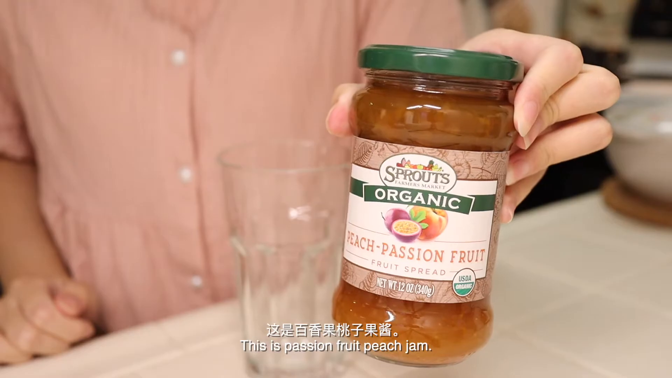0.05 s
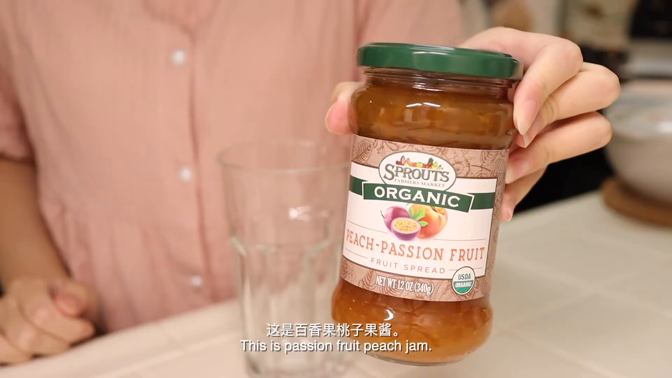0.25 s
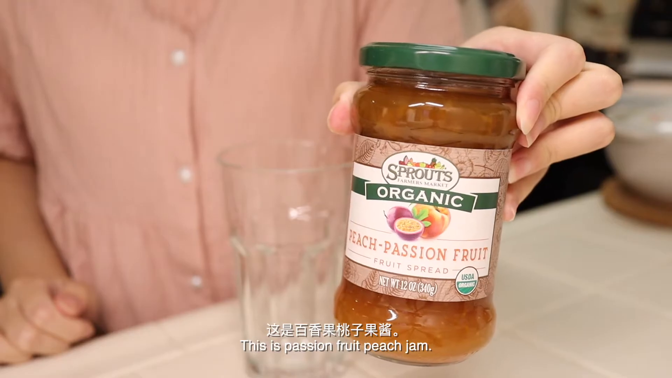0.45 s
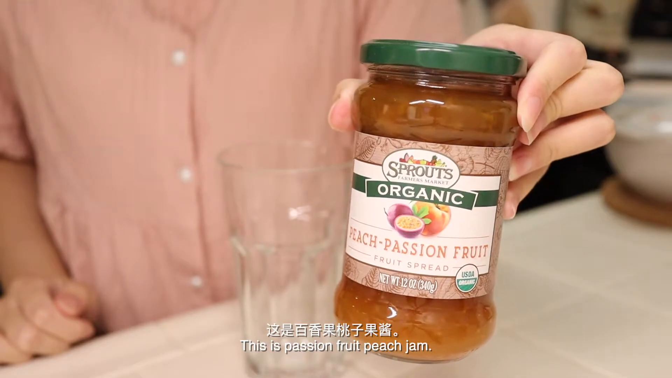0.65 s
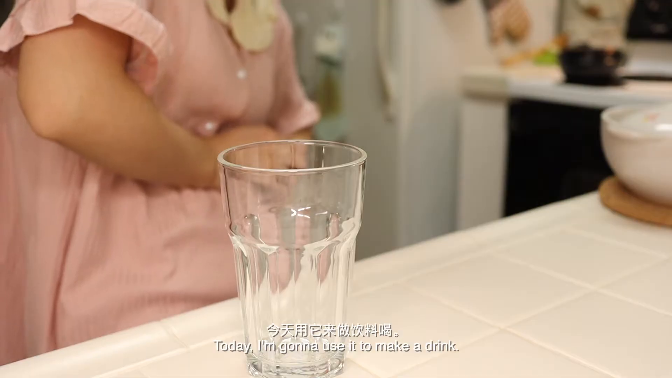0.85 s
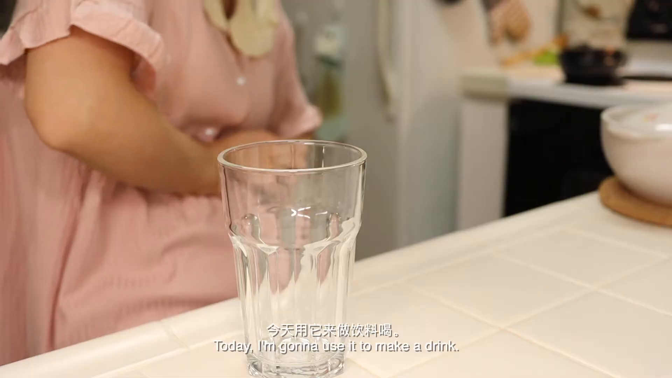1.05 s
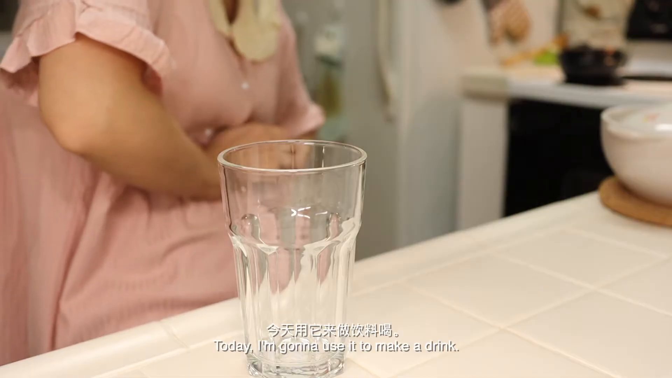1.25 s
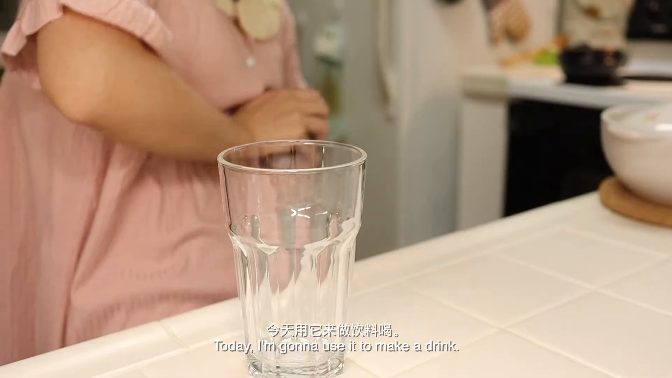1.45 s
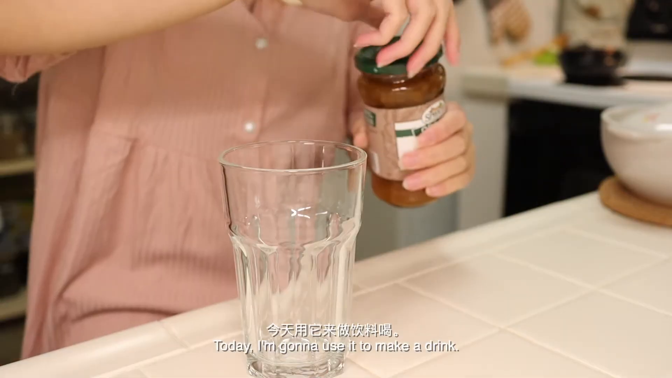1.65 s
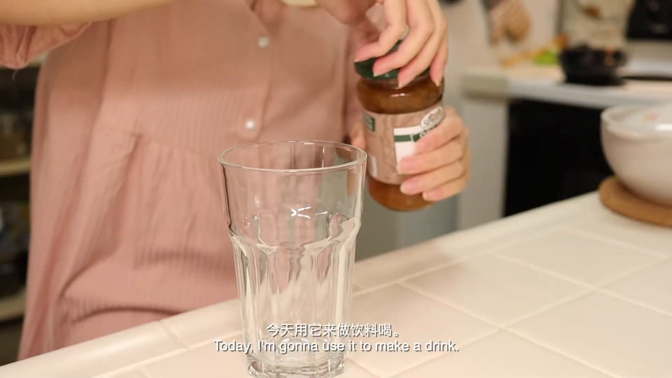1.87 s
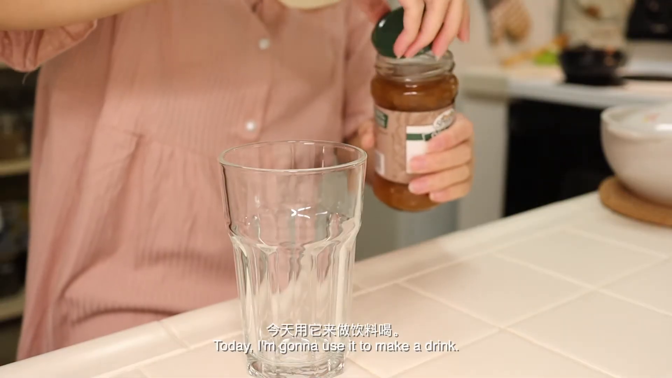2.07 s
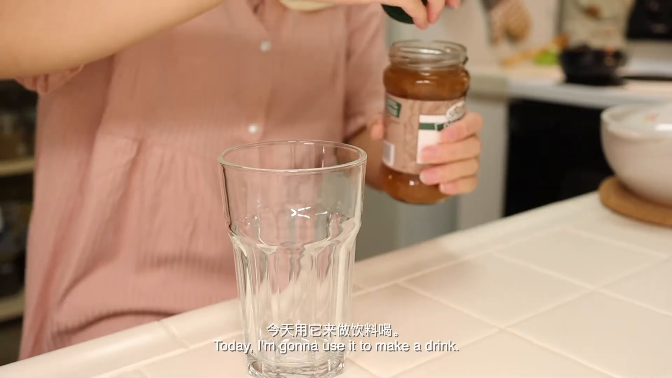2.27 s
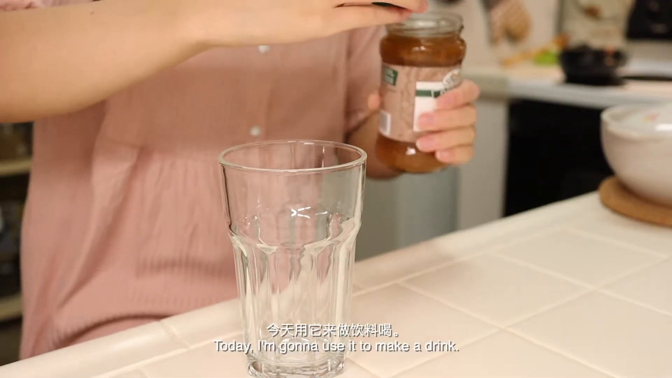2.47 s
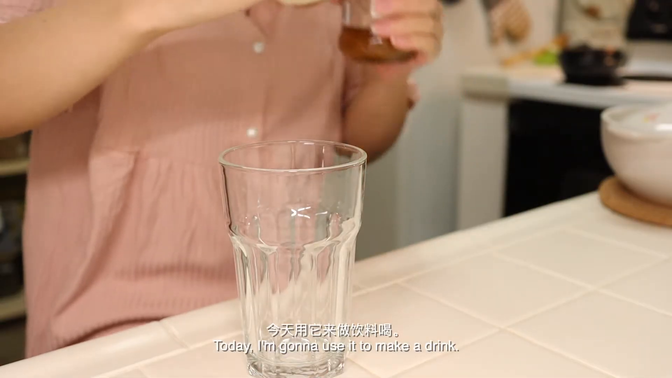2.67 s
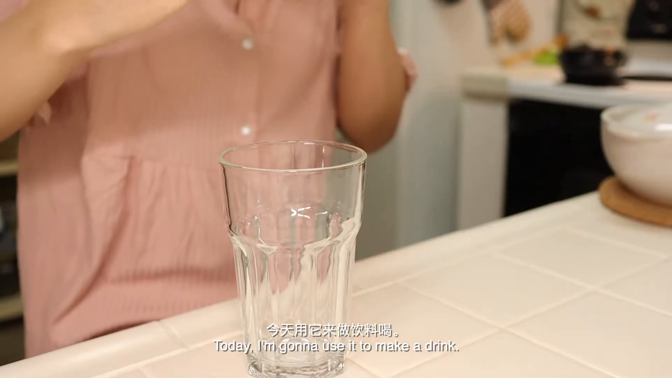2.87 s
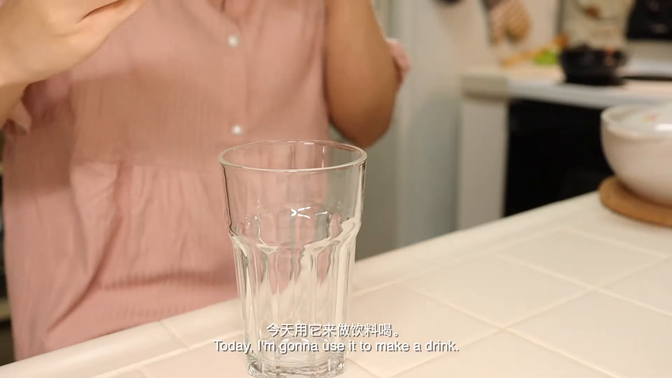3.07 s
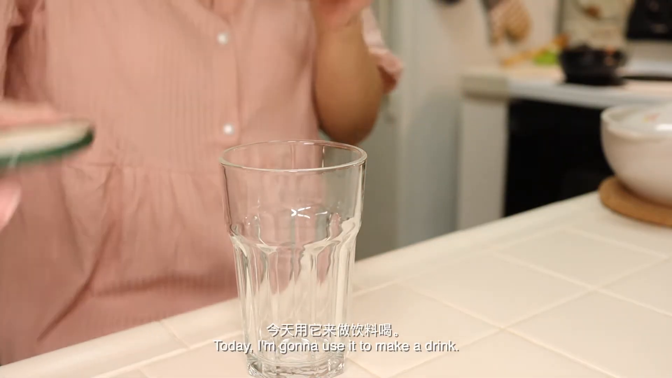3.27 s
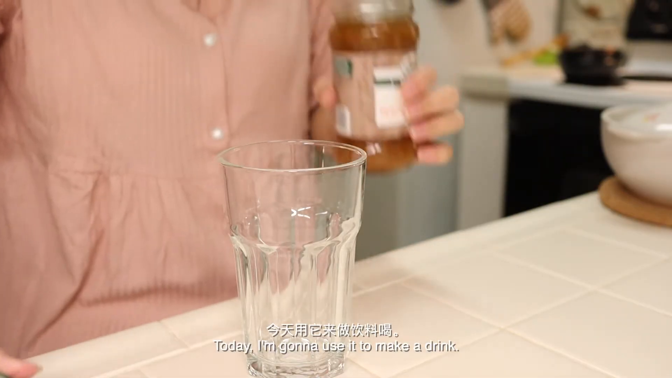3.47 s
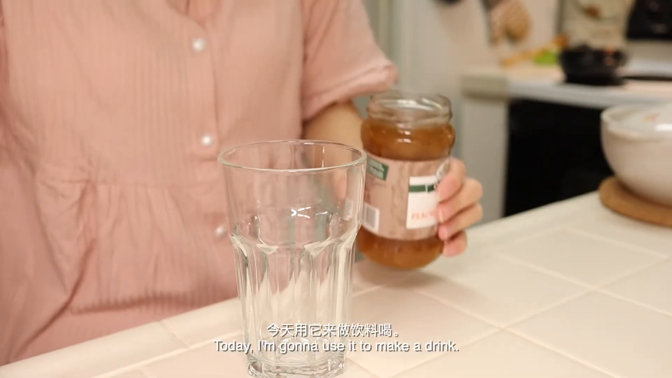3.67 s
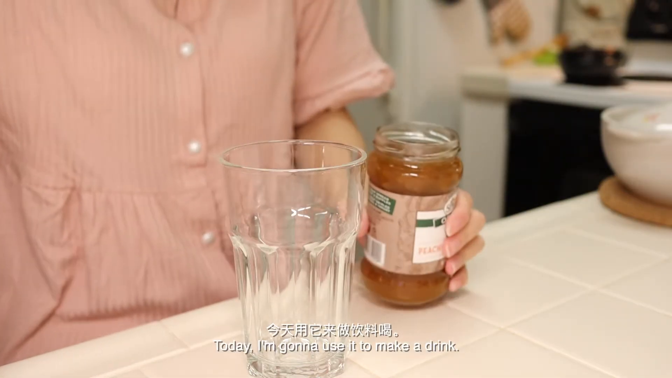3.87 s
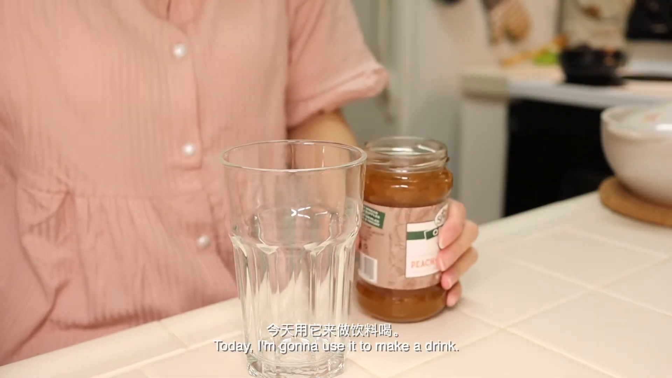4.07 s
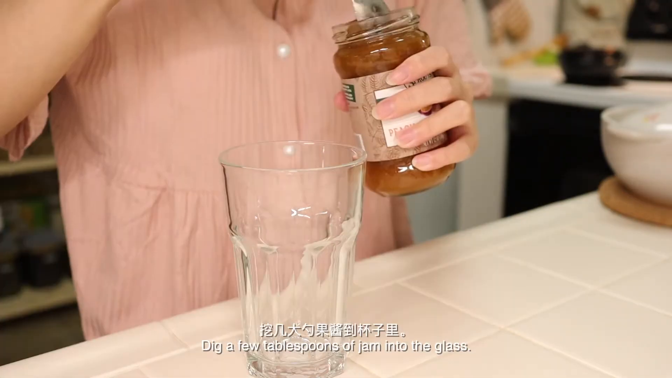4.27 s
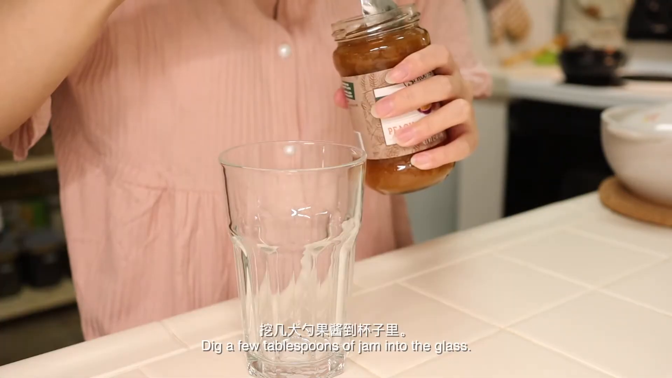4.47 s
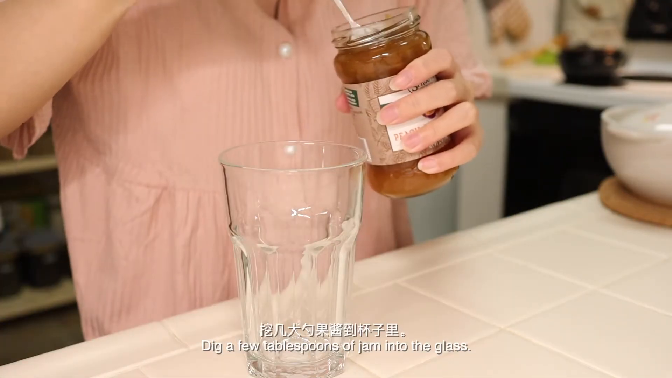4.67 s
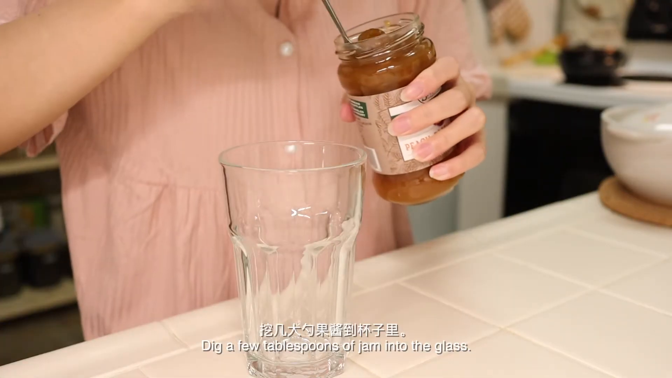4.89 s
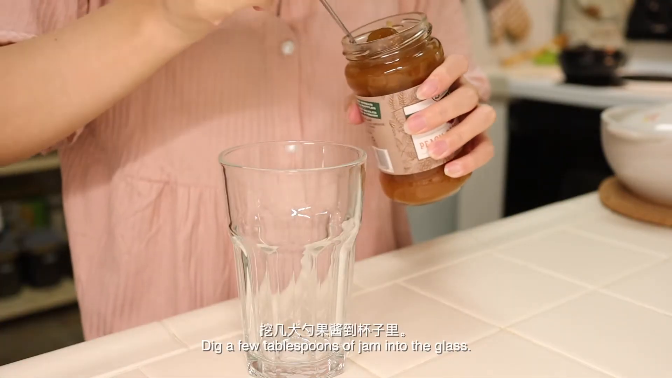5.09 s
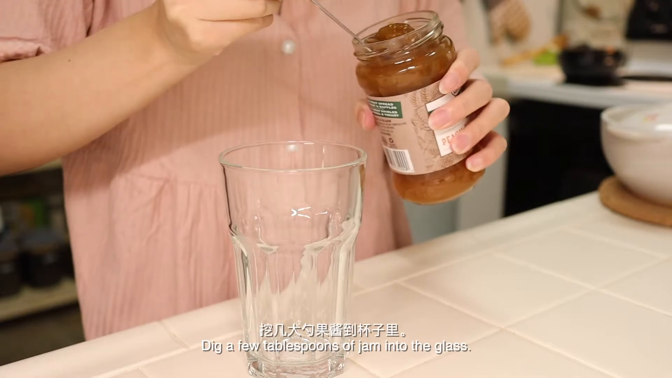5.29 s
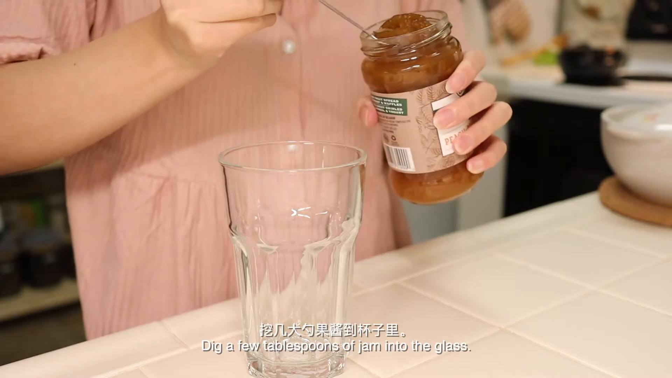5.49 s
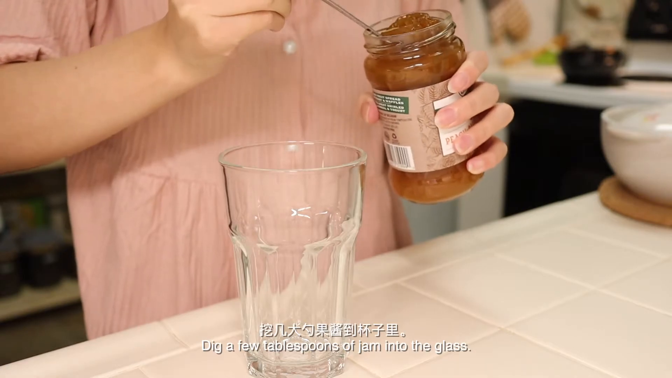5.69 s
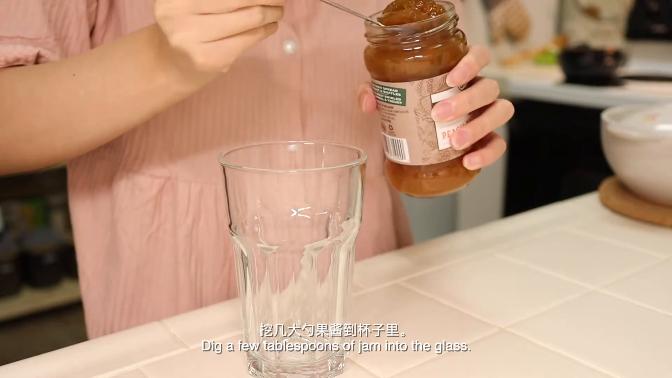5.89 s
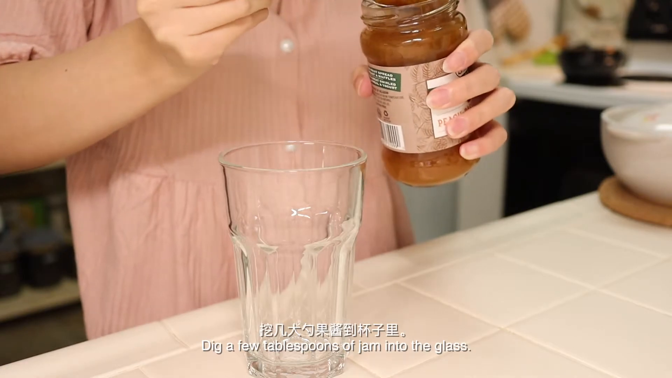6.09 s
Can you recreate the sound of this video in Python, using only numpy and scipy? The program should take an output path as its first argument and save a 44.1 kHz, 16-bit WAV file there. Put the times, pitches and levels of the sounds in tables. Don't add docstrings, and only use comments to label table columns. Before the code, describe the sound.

A quiet tiled kitchen with soft room noise and a low refrigerator hum throughout, heard by a close microphone. After a second of near silence, small finger ticks lead to an explosive lid pop at 1.19, overloading the input, with a low puff of air and a metallic buzz fading by 1.35. From 1.75 the lid catches and drags on glass threads, clicking at 1.82 and springing free at 1.92. Quiet follows; faint ticks and a rustle swell near 3.3 and stop abruptly. At 3.55 the lid lands hard on tile, bright and quickly settling. At 3.86 to 3.91 a spoon chatters and rings among cutlery. A heavy wooden drawer thud at 4.03 rolls on, squeezed air rising in pitch, with another knock at 4.24 before a sudden cut at 4.26. A soft tick comes at 4.68, a clear spoon tick on the glass rim at 4.89, then tiny sticky clicks around 5.4 to 5.55.

```python
import sys
import numpy as np
from scipy import signal
from scipy.io import wavfile
from scipy.ndimage import uniform_filter1d

SR = 44100
rng = np.random.default_rng(int(sys.argv[2]) if len(sys.argv) > 2 else 0)


def gain_from_decibels(decibels):
    exponent = np.asarray(decibels, float) / 20
    return 10 ** exponent


def transcribe(signal):
    frames = np.atleast_2d(signal).T
    limited = np.clip(frames, -1, 1)
    pcm = np.round(limited * 32767).astype(np.int16)
    wavfile.write(sys.argv[1], SR, pcm)


N = 270774
RUSTLE_CUT_S, CUT_S = 3.3435, 4.2603


def evened(x):
    return x / np.sqrt(np.mean(x ** 2) + 1e-20)


def peaked(x):
    return x / abs(x).max()


def read(points, hz):
    f, value = np.transpose(points)
    return np.interp(np.log(hz + 1), np.log(f + 1), value)


def add(mix, s, sound):
    part = mix[round(s * SR):][:len(sound)]
    part += sound[:len(part)]


def above(x, hz, order):
    return signal.sosfilt(signal.butter(order, hz, "high", fs=SR, output="sos"), x)


def banded(x, edges):
    return signal.sosfilt(signal.butter(2, edges, "band", fs=SR, output="sos"), x)


def causal(points, size=4096):
    hz = abs(np.fft.fftfreq(size, 1 / SR))
    log_gain = np.log(gain_from_decibels(np.maximum(read(points, hz), -80)))
    return np.fft.ifft(np.exp(np.conj(signal.hilbert(log_gain)))).real[:size // 2]


def burst(ms, size=2048):
    noise = rng.standard_normal(size)
    noise[0] = 3
    return noise * np.exp(-np.arange(size) / (SR * max(ms, .05) / 1000))


# (frequency [Hz], T60 [s])
ECHO_T60 = [(100, 0.72), (500, 0.35), (2000, 0.25), (8000, 0.32), (15000, 0.19)]
# (frequency [Hz], level [dB])
ECHO_COLOUR = [(100, 11), (500, -5.5), (1200, 4.5), (6000, 2.5), (15000, 4)]


def kitchen(x, rise_ms):
    taps = np.zeros(SR // 2)
    at = np.arange(100, SR // 2 - 20, 20)
    at = at + rng.integers(0, 20, len(at))
    taps[at] = rng.choice([-1., 1.], len(at))
    hz, t, z = signal.stft(taps, SR, nperseg=256)
    z = z * gain_from_decibels(read(ECHO_COLOUR, hz)[:, None] - 60 * t / read(ECHO_T60, hz)[:, None])
    tail = signal.istft(z, SR, nperseg=256)[1]
    tail = tail * (1 - np.exp(-np.arange(len(tail)) * 1000 / (rise_ms * SR)))
    return signal.oaconvolve(x, tail / np.linalg.norm(tail))[:N]


def struck(contacts, modes, crack, wet_db, rise_ms, spread_db=2.0):
    cracks, rung = np.zeros(N), np.zeros(N)
    t, colour = np.arange(SR // 2) / SR, causal(crack)
    hz, db, t60 = np.transpose(modes)
    decays = np.exp(np.outer(2j * np.pi * hz - np.log(1000) / t60, t))
    for s, peak_db, ring_db, ms, top_hz in contacts:
        spot_db, phase = rng.standard_normal((2, len(modes)))
        weights = gain_from_decibels(db + spread_db * spot_db) * np.exp(1j * phase) / (1 + (hz / top_hz) ** 2)
        ring = (weights @ decays).imag * np.minimum(t / 0.00028, 1)
        add(rung, s, gain_from_decibels(peak_db + ring_db) * peaked(ring))
        dull = signal.butter(2, min(top_hz, 20000), fs=SR)
        blow = signal.lfilter(*dull, signal.fftconvolve(burst(ms), colour))
        add(cracks, s, gain_from_decibels(peak_db) * peaked(blow))
    to_walls = cracks + 0.4 * rung
    return cracks + rung + gain_from_decibels(wet_db + 1.5) * kitchen(to_walls, rise_ms)


def rubbed(strokes, modes, per_s, top_hz, damping):
    t = np.arange(N) / SR
    slips = rng.standard_normal(N) * (rng.random(N) < per_s / SR)
    ring, short = 0, t[:4000]
    for hz, db, t60 in modes:
        decay = gain_from_decibels(db - 60 * short / (damping * t60))
        ring = ring + decay / (1 + (hz / top_hz) ** 2) * np.sin(2 * np.pi * hz * short)
    pressure = 0
    for s, length, db in strokes:
        pressure = pressure + gain_from_decibels(db) * np.sin(np.pi * np.clip((t - s) / length, 0, 1))
    return evened(signal.oaconvolve(slips, ring)[:N]) * pressure


def ticks(rows, share, ms):
    out = np.zeros(N)
    for s, db, hz in rows:
        edges = np.clip([hz * (1 - share / 2), hz * (1 + share / 2)], [500, 900], [15000, 19000])
        add(out, s, gain_from_decibels(db) * peaked(banded(burst(ms), edges)))
    return out


# (frequency [Hz], level [dB])
AIR = [(30, -27), (49, -1), (75, -14.5), (95, 4.5), (115, -20), (146, -3.5), (329, -8.5), (424, -1.5),
       (593, -14), (1190, -15), (2600, -21.5), (3100, -24.5), (14900, -33), (16200, -41)]


def room_noise():
    frames, hz = N // 512 + 6, np.fft.rfftfreq(2048, 1 / SR)
    a, b, patches = rng.standard_normal((frames, 1025, 3)).T
    patches = evened(uniform_filter1d(uniform_filter1d(patches, size=14, axis=0), size=6, axis=1))
    z = (a + 1j * b) * gain_from_decibels(read(AIR, hz)[:, None] + 0.45 * patches)
    return gain_from_decibels(-46 - 1.5) * evened(signal.istft(z, nperseg=2048, noverlap=1536)[1][:N])


# (frequency [Hz], rms level [dB])
HUM = [(48, -59), (59.5, -58.5), (119, -56), (360, -62), (431, -75)]


def refrigerator():
    out, t = np.zeros(N), np.arange(N) / SR
    for hz, db in HUM:
        waver = uniform_filter1d(uniform_filter1d(rng.standard_normal(N), size=6000), size=6000)
        waver = evened(waver)
        phase = 2 * np.pi * (hz * t + rng.random()) + 0.76 * waver[::-1]
        out += np.sqrt(2) * gain_from_decibels(db + 1.5 * waver) * np.sin(phase)
    return out


def rustle():
    until = RUSTLE_CUT_S - np.arange(N) / SR
    grains = rng.standard_normal(N) * (rng.random(N) < 2700 / SR)
    crackle = evened(banded(grains, (3500, 13000)))
    return crackle * gain_from_decibels(-49 - 170 * abs(until)) * (until > 0)


# (time [s], peak level [dB], centre [Hz])
GRIP = [(1.113, -41, 2110), (1.149, -37, 3500), (1.1565, -33, 2230), (1.158, -32, 5030),
        (1.1767, -15.5, 2170), (1.178, -21, 5030), (2.017, -47, 4900), (3.977, -36, 2000),
        (4.677, -29, 7800), (5.4382, -44, 2620)]
# (time [s], peak level [dB], centre [Hz])
FOIL = [(1.180, -22, 7000), (1.1835, -37, 8000), (3.214, -44, 10000), (3.287, -51, 9000),
        (3.305, -48, 7500), (3.324, -32.5, 5900), (3.3404, -37, 8400), (4.847, -44, 8800),
        (4.866, -44, 7000), (5.438, -48, 10000)]
# (time [s], peak level [dB], centre [Hz])
JAM = [(5.390, -50, 13000), (5.403, -47, 13500), (5.484, -45, 8800), (5.507, -39, 9400),
       (5.520, -42, 11500), (5.527, -32, 14000), (5.544, -45, 11500)]


def touches():
    out = ticks(GRIP, share=0.26, ms=1.5) + ticks(FOIL, share=1, ms=4.8)
    out = out + ticks(JAM, share=0.29, ms=1.1) + rustle()
    t = np.arange(N) / SR
    heard = (t < RUSTLE_CUT_S) | (t > CUT_S - .01)
    return (out + gain_from_decibels(-6.5) * kitchen(out, rise_ms=4.4)) * heard


# (time [s], level [dB], frequency [Hz], T60 [s])
FREE_RINGS = [(1.2004, -16, 7410, .045), (3.306, -42, 5530, .025), (3.553, -19, 5095, .18),
              (3.553, -28, 9400, .03), (3.553, -30, 6218, .08), (3.554, -22.5, 4188, .17),
              (3.554, -36, 10960, .12), (3.866, -21.5, 3815, .19), (3.867, -25, 4492, .12),
              (3.889, -27, 4495, .15), (3.862, -30, 3141, .18), (3.889, -29, 3141, .24),
              (4.026, -33, 2116, .62), (4.027, -38.5, 5297, .18), (1.750, -33, 905, .04),
              (1.1884, -2, 2520, .007), (1.2003, -17, 1040, .03), (4.192, -34, 256, .12),
              (4.238, -27, 500, .12), (4.029, -19, 108, .16), (4.027, -16, 492, .18),
              (4.095, -22, 290, .22), (4.026, -20, 1500, .07), (4.24, -33, 105, .1),
              (4.889, -26, 3618, .08), (3.897, -23, 3138, .03), (4.0258, -12, 1060, .035),
              (1.189, -4, 1030, .022), (1.189, -14, 1350, .01), (3.8612, -16, 7400, .03),
              (3.888, -24, 11830, .03), (1.930, -33, 1110, .04), (1.836, -39, 1640, .08),
              (2.018, -44, 3493, .04), (2.018, -49, 4255, .08), (1.75, -47, 4110, .05),
              (1.923, -32, 1640, .08), (1.837, -41, 2190, .05), (1.971, -45, 1640, .08)]
# (time [s], level [dB], frequency [Hz], damped after [s])
HELD_RINGS = [(1.152, -38, 2060, 0.023), (1.237, -21.5, 1014, 0.023), (1.992, -44.5, 1637, 0.03),
              (1.355, -45, 1030, 0.026), (3.331, -42, 2220, 0.015), (3.555, -19.5, 1136, 0.02),
              (3.58, -32.5, 1149, 0.021), (3.736, -51.5, 3100, 0.099)]


def rings():
    out = np.zeros(N)
    free = [(s, db, hz, t60, t60) for s, db, hz, t60 in FREE_RINGS]
    held = [(s, db, hz, 0.28, length) for s, db, hz, length in HELD_RINGS]
    for s, db, hz, t60, length in free + held:
        t = np.arange(0, length, 1 / SR)
        fades = np.minimum(t / 0.00011, 1) * np.minimum((length - t) / 0.0033, 1)
        add(out, s, gain_from_decibels(db - 60 * t / t60) * np.sin(2 * np.pi * (hz * t + rng.random())) * fades)
    return out + gain_from_decibels(-15.5) * kitchen(out, rise_ms=6.2)


# (time [s], pitch [Hz], rms level [dB])
SQUEEZE = [(4.145, 280, -50), (4.162, 297, -36), (4.178, 330, -37), (4.192, 360, -39), (4.208, 376, -33),
           (4.222, 412, -39), (4.235, 400, -44)]


def squeezed_air():
    t, (s, hz, db) = np.arange(N) / SR, np.transpose(SQUEEZE)
    turns = np.cumsum(np.interp(t, s, hz)) / SR
    wobble = .25 * evened(uniform_filter1d(rng.standard_normal((2, N)), size=500, axis=1))
    tone = np.sin(2 * np.pi * turns + wobble[0])
    tone += gain_from_decibels(-8) * np.sin(2 * np.pi * 1.9 * turns + 2 * wobble[1])
    fades = np.clip(np.minimum(t - s[0], s[-1] - t) / 0.0068, 0, 1)
    out = np.sqrt(2) * tone * gain_from_decibels(np.interp(t, s, db)) * fades
    return out + gain_from_decibels(-4) * kitchen(out, rise_ms=3.4)


# (time [s], peak level [dB], ring level [dB], crack length [ms], hardness [Hz])
TWIST = [(1.749, -43, 7, 0.82, 2500), (1.791, -47, 10, 3, 2000), (1.803, -45, 15, 5.7, 1500),
         (1.810, -41, 12, 3, 1500), (1.8172, -23.5, -0.5, 1.8, 14000), (1.8215, -29.5, 10, 1.3, 9000),
         (1.8365, -30, -1, 1.7, 12000), (1.848, -40, 2, 2.7, 4000), (1.905, -34.5, -18, 5, 4000)]
# (frequency [Hz], level [dB], T60 [s])
JAR_MODES = [(900, -2, .04), (1160, 0, .05), (1290, -5, .05), (1640, -11, .05), (4200, -4, .025),
             (4030, -6, .03), (8000, -3, .015)]
# (frequency [Hz], level [dB])
TWIST_CRACK = [(350, -77), (600, -27), (1160, 12.5), (1510, -7), (3250, -17.5), (4160, -1), (4800, -25),
               (5800, -11), (7000, -20), (8270, -18), (16000, -35)]
# (start [s], length [s], top level [dB])
DRAG = [(1.742, 0.036, -47), (1.765, 0.066, -44), (1.82, 0.058, -46.5), (1.862, 0.055, -52),
        (1.975, 0.06, -60)]


def twist():
    knocks = struck(TWIST, JAR_MODES, TWIST_CRACK, wet_db=-3.5, rise_ms=3.2)
    return knocks + rubbed(DRAG, JAR_MODES, per_s=810, top_hz=1800, damping=1.0)


# (time [s], peak level [dB], ring level [dB], crack length [ms], hardness [Hz])
RELEASE = [
    (1.9221, -15.5, -10.5, 1.8, 15000),
    (1.935, -33, -12, 1.9, 9000),
]
# (frequency [Hz], level [dB], T60 [s])
NECK_MODES = [(1156, -1, .05), (1625, 0, .08), (4188, -4, .05), (6400, -12, .02), (7434, -5, .05),
              (8200, 0, .012), (11500, -14, .03)]
# (frequency [Hz], level [dB])
RELEASE_CRACK = [(350, -61), (600, -34), (1590, -1), (2470, -65), (3730, -8), (4110, -6), (5400, -25),
                 (8270, 1), (16000, -73)]


def release():
    return struck(RELEASE, NECK_MODES, RELEASE_CRACK, wet_db=-14.5, rise_ms=2.3)


# (time [s], peak level [dB], ring level [dB], crack length [ms], hardness [Hz])
LAID = [
    (3.5530, -1.5, -9.5, 1.16, 18900),
    (3.5578, -9, -19, 1.7, 12000),
    (3.5647, -24.5, 9.5, 1.1, 18900),
]
# (frequency [Hz], level [dB], T60 [s])
TILE_MODES = [(2961, -14, .03), (3106, -14, .04), (3817, -14, .04), (4495, -9, .02), (4985, -8, .04),
              (5512, -9, .06), (5722, -10, .04), (6428, -9, .035), (7854, -16, .03), (9400, -19, .015),
              (10960, -17, .02), (15200, -15, .01)]
# (frequency [Hz], level [dB])
LAID_CRACK = [(290, -61), (500, -31.5), (1030, -19.5), (1130, -14), (1250, -29), (1550, -27), (2910, -16),
              (3130, -12.5), (3610, -19), (4060, -15), (4980, -6), (7160, -22), (8400, -33), (10900, -29),
              (13200, -43), (15200, -25), (16200, -55)]


def lid_laid_down():
    return struck(LAID, TILE_MODES, LAID_CRACK, wet_db=-9, rise_ms=2.6)


# (time [s], peak level [dB], ring level [dB], crack length [ms], hardness [Hz])
SPOON = [(3.8611, -5.5, -4, 1.2, 19000), (3.8640, -17, -6, 0.88, 8000), (3.8670, -13, -7.5, 2.1, 19000),
         (3.8725, -25, -12, 1.8, 12000), (3.8795, -22, -13, 2.3, 9000), (3.8880, -10.5, -10, 3, 19200),
         (3.8945, -24, -8, 1.8, 12000), (3.8985, -12, -15, 2, 8000), (3.910, -23, -4, 2, 5000)]
# (frequency [Hz], level [dB], T60 [s])
SPOON_MODES = [(1087, -10, .04), (3052, -10, .04), (4016, -9, .05), (4490, -7, .05), (5033, -8, .045),
               (5518, -6, .1), (6465, -14, .04), (7025, -6, .06), (7251, -4, .045), (9335, -15, .03),
               (11830, -10, .015), (13740, -14, .04), (15200, -16, .025)]
# (frequency [Hz], level [dB])
SPOON_CRACK = [(290, -44), (500, -38), (1080, -2.5), (1340, -12.5), (2550, -16.5), (3040, 6), (3410, -23),
               (3720, -0.5), (4240, -13.5), (7270, -5.5), (8160, -14.5), (11900, -14.5), (13100, -28),
               (14400, -20), (16200, -46)]
# (start [s], length [s], top level [dB])
CHATTER = [
    (3.862, 0.021, -33),
    (3.878, .03, -27),
    (3.90, 0.049, -43.5),
]


def spoon():
    knocks = struck(SPOON, SPOON_MODES, SPOON_CRACK, wet_db=-12.0, rise_ms=2.5)
    return knocks + rubbed(CHATTER, SPOON_MODES, per_s=940, top_hz=12000, damping=0.38)


# (time [s], peak level [dB], ring level [dB], crack length [ms], hardness [Hz])
RIM = [
    (4.8880, -12.5, -7.5, 3.2, 19000),
    (4.900, -26, -6, 3.3, 12000),
    (4.912, -32, 0, 1.1, 6000),
]
# (frequency [Hz], level [dB], T60 [s])
RIM_MODES = [(1744, -1, .035), (2035, -7, .05), (2300, -5, .025), (2930, -4, .025), (3300, -4, .018),
             (3618, 0, .03), (3967, -5, .04), (5152, -4, .04), (6202, -8, .05), (6842, -6, .04),
             (7181, -9, .05), (9362, -5, .04), (10890, -4, .14), (11340, -2, .07)]
# (frequency [Hz], level [dB])
RIM_CRACK = [(590, -59), (1000, -48), (1710, -5), (2620, -18), (2910, 2), (3620, 2.5), (4310, -19),
             (4960, -9.5), (5970, -9.5), (11300, -9), (16000, -24)]


def rim_tick():
    return struck(RIM, RIM_MODES, RIM_CRACK, wet_db=-11.5, rise_ms=3.3)


# (time [s], peak level [dB], ring level [dB], crack length [ms], hardness [Hz])
DRAWER = [(4.0256, -2, -4.5, 4.6, 11900), (4.031, -7.5, -4, 1.7, 2500), (4.0392, -10.5, -7, 0.95, 1800),
          (4.049, -12, -1.5, 1.8, 1800), (4.0672, -14, 1.5, 2.5, 5000), (4.0805, -15, -12, 2.7, 1500),
          (4.092, -17.5, -7.5, 5.8, 1800), (4.105, -26, -9, 2.7, 1200), (4.1995, -37, -4, 3.6, 900),
          (4.2375, -16.5, -6.5, 0.97, 1720), (4.250, -28, -2, 4.4, 910)]
# (frequency [Hz], level [dB], T60 [s])
DRAWER_MODES = [(108, -9, .1), (274, -6, .22), (297, -7, .3), (365, -9, .15), (490, 0, .2), (538, -8, .18),
                (630, -5, .18), (706, -6, .16), (754, -10, .14), (855, -6, .16), (1020, -4, .14),
                (1085, -4, .1), (1308, -7, .1), (1500, -6, .1)]
# (frequency [Hz], level [dB])
DRAWER_CRACK = [(53, -47), (100, -16), (195, -8), (280, 4), (419, -6), (1090, -0.5), (1510, -15.5),
                (1830, -12), (2180, -11.5), (4080, -33), (9510, -38), (16000, -68)]
# (start [s], length [s], top level [dB])
ROLL = [(4.095, 0.052, -31.5), (4.145, 0.043, -33.5), (4.18, 0.048, -34), (4.228, .07, -33.5)]


def drawer():
    thuds = struck(DRAWER, DRAWER_MODES, DRAWER_CRACK, wet_db=-13.5, rise_ms=1.9)
    rolling = rubbed(ROLL, DRAWER_MODES, per_s=1700, top_hz=490, damping=0.71)
    return above(thuds, hz=80.6, order=3) + above(rolling, hz=186, order=3)


def air_rush():
    ms = (np.arange(N) / SR - 1.1880) * 1000
    return above(-gain_from_decibels(-10) * np.exp(-(ms / 0.63) ** 2), hz=71.4, order=1)


# (time [s], peak level [dB], ring level [dB], crack length [ms], hardness [Hz])
POP = [(1.1857, -20, -5, 3, 3000), (1.1886, 6.5, -3, 0.25, 6000), (1.191, -8, -18, 2.4, 19000),
       (1.1962, -12, -36, 4.4, 5000), (1.1985, -12, -9, 1.6, 5000), (1.2000, -12, -11, 3.3, 16000),
       (1.2075, -17, -21, 3, 4000), (1.2195, -42, -14, 2, 6000), (1.239, -15, -33, 3, 5000)]
# (frequency [Hz], level [dB], T60 [s])
LID_MODES = [(1034, -2, .018), (2000, -3, .006), (2600, 3, .008), (5300, -8, .006), (7400, -19, .3),
             (15030, -17, .006)]
# (frequency [Hz], level [dB])
POP_CRACK = [(120, -31), (350, -11.5), (600, -13), (1040, -42), (1400, -7.5), (2550, -4.5), (3700, 5),
             (5300, -12.5), (6300, -17.5), (7500, -2.5), (8300, -14), (12300, -7), (13800, -39),
             (15030, -12), (16500, -44)]
# (start [s], length [s], top level [dB])
BUZZ = [
    (1.193, 0.031, -26),
    (1.205, 0.069, -28.5),
    (1.25, .06, -34.5),
    (1.29, 0.084, -48),
]
# (frequency [Hz], level [dB], T60 [s])
BUZZ_MODES = [(1040, 0, .04), (1900, -8, .012), (2480, 0, .025), (2660, -1, .03), (3070, -4, .02),
              (3750, 1, .022), (4300, -3, .015), (4930, -6, .02), (5320, -8, .02), (7000, -13, .02),
              (7420, -3, .03), (8890, -16, .02), (11600, -13, .015), (15000, -13, .015)]


def lid_pop():
    snap = struck(POP, LID_MODES, POP_CRACK, wet_db=-12.5, rise_ms=75) + air_rush()
    return snap + rubbed(BUZZ, BUZZ_MODES, per_s=2500, top_hz=14000, damping=1.0)


def scene():
    before = rings() + squeezed_air() + twist() + release() + lid_laid_down()
    before += spoon() + drawer() + lid_pop()
    held = round(1.5 * SR)
    before[:held] = signal.lfilter(*signal.iirnotch(600, 2.4, SR), before[:held])
    before *= np.clip((CUT_S - np.arange(N) / SR) / 0.00033, 0, 1)
    background = above(room_noise() + refrigerator(), hz=38.0, order=8)
    return (background + touches() + before + rim_tick())[None]


def low_pass(x):
    return signal.sosfilt(signal.butter(12, 16320, fs=SR, output="sos"), x)


def record(dry):
    clipped = np.clip(dry, -.98, .98)
    return low_pass(clipped)


dry = scene()
out = record(dry)
transcribe(out)
```